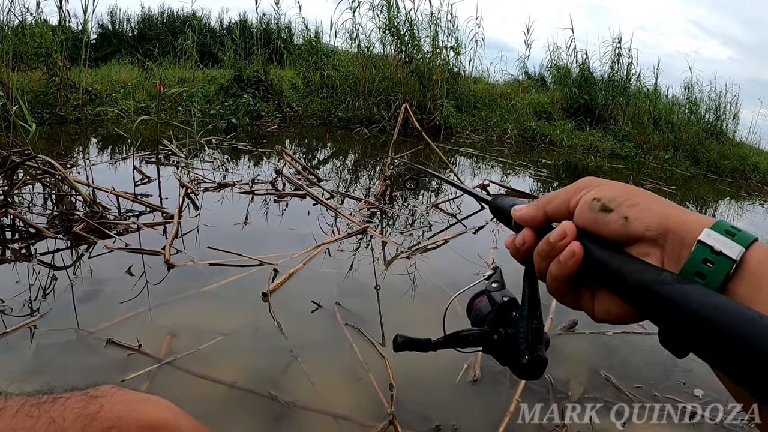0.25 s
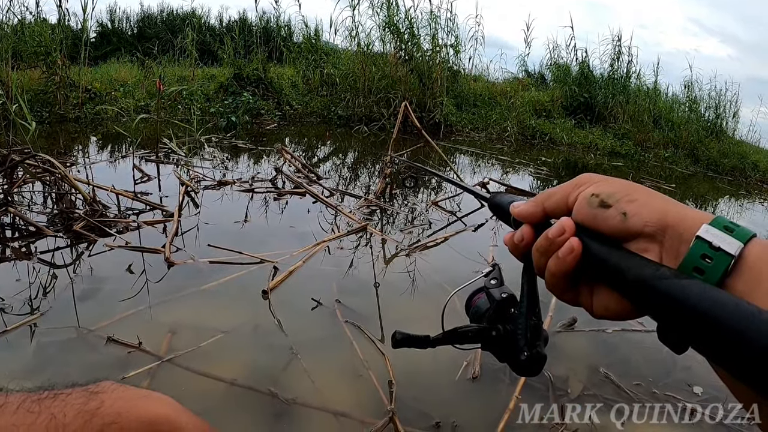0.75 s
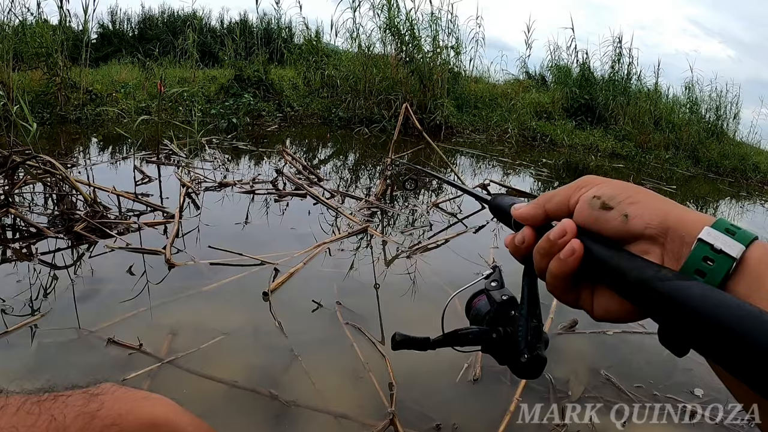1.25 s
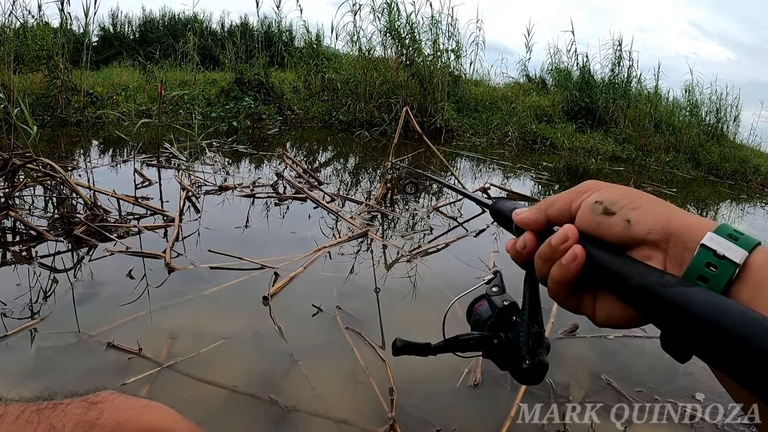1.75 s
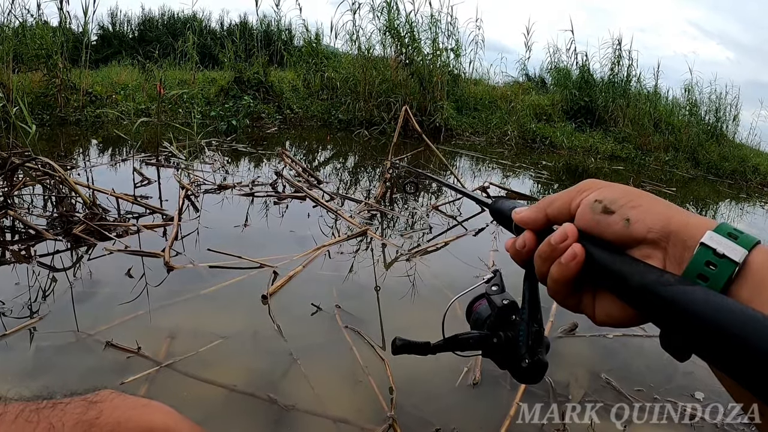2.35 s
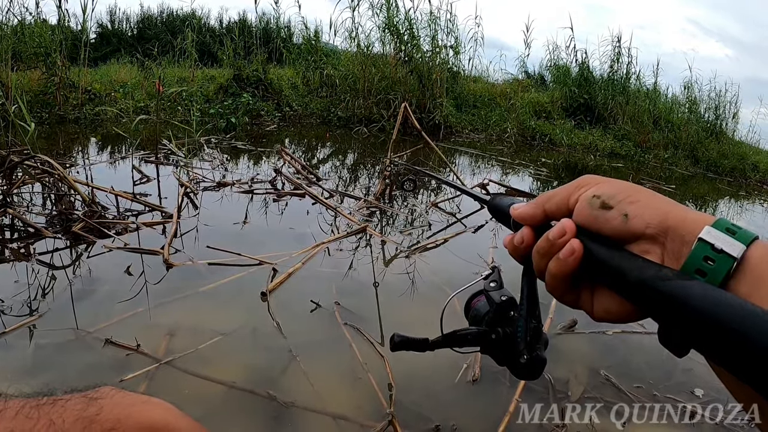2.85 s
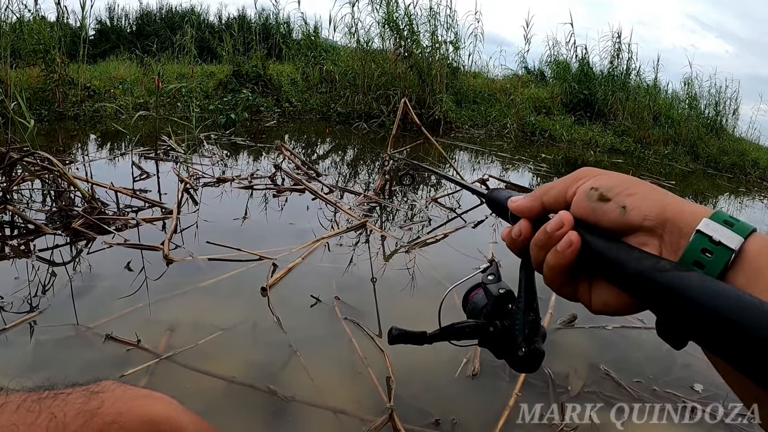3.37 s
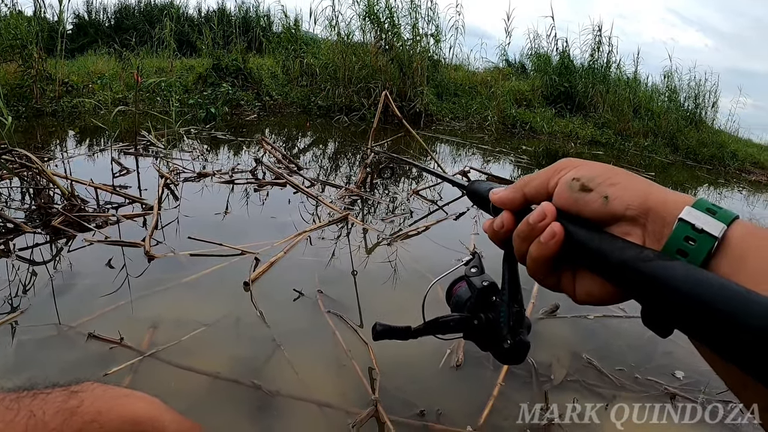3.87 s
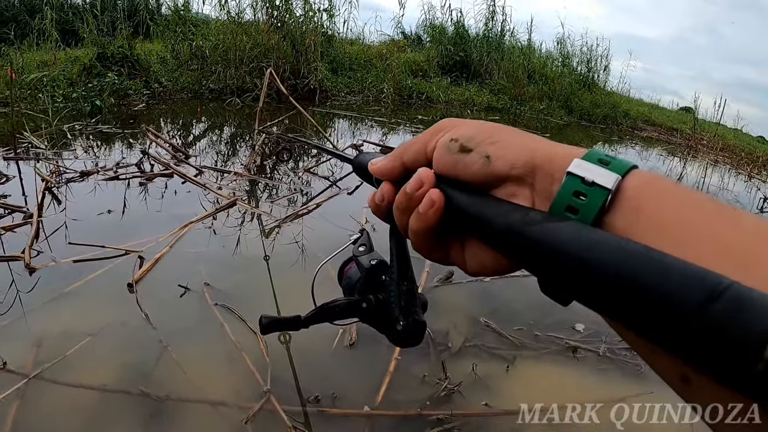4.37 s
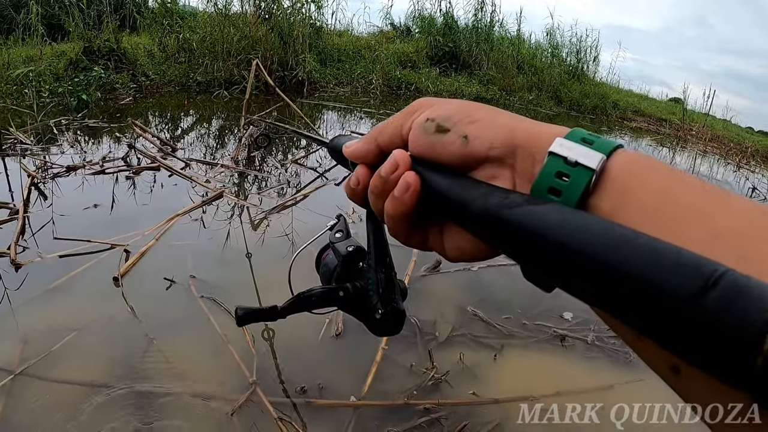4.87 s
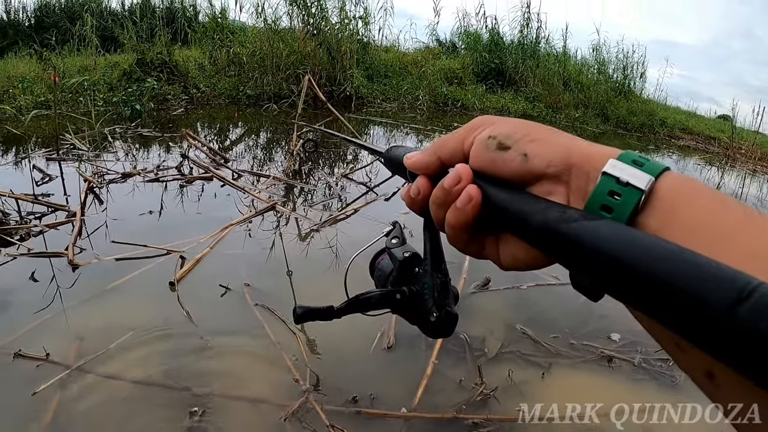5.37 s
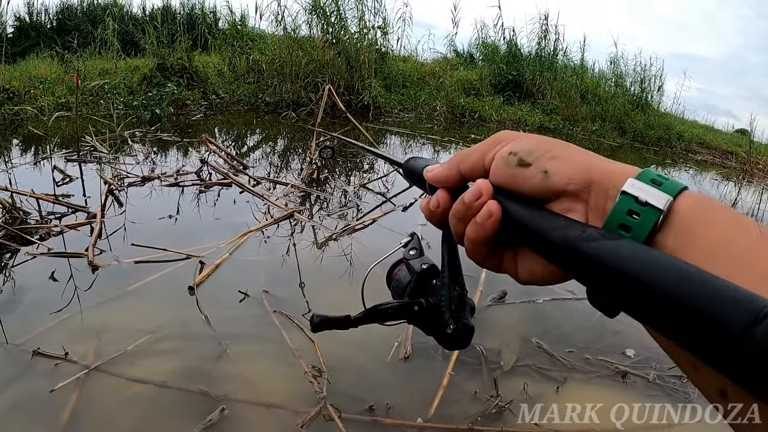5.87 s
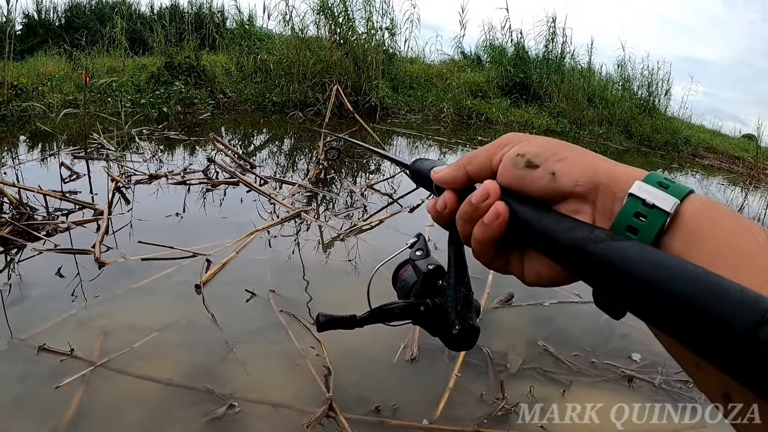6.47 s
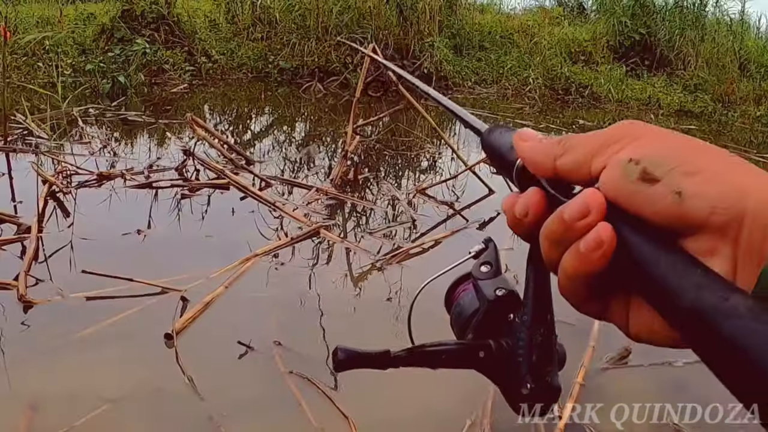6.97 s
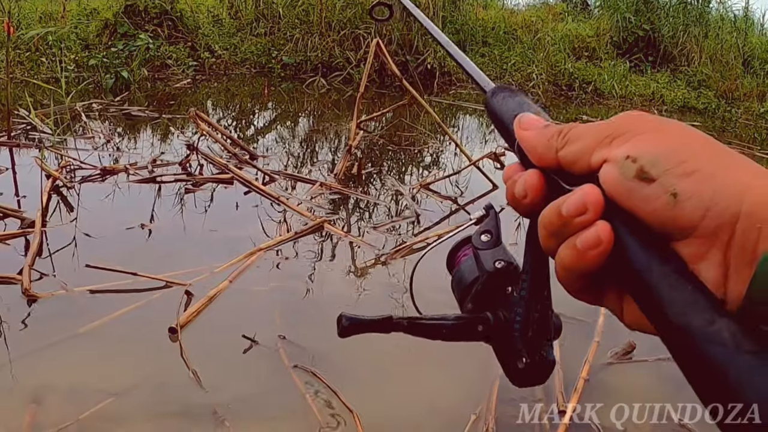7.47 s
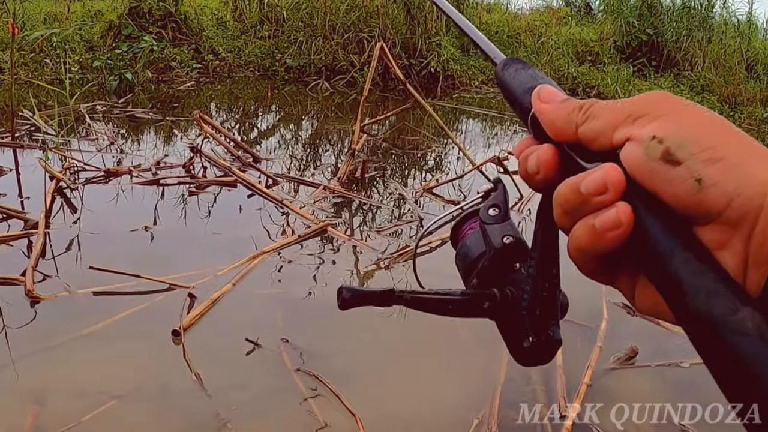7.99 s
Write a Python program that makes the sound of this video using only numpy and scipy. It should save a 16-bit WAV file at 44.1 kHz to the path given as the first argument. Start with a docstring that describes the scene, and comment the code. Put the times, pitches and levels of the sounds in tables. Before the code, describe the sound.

Throughout 0-8 s, a soft, deep rumble of far traffic with a wavering motor hum lies under a steady, shrill bush-cricket whine around 7-8 kHz, finely pulsed. A field cricket adds rapid chirps at 0-0.6, 1.6-3.6, 4.5-7 and at the end. From 0 to 1.8 a near bird, left of centre, sings four short phrases about half a second apart: falling slur, hoarse buzzing trill, wavy warble. Small chips stutter between them. Higher quavering falling whistles come at 1.2, 2.3 and, clearest, 3.3. Thin far whistles sink at 2.7 and 3.6. At 4.0-4.7 cloth swishes close by in two strokes; sharp dry rod and reel ticks cluster at 4.55-4.9, with weaker ones to 5.9. Sparse chips continue; a far fowl calls faintly at 6.2 as an engine swells. Tiny clicks at 7.2. Open air, light echo from reeds and bank.

```python
"""Marshy pond edge, on the microphones of a camera worn by an angler; far traffic rumbles low.
Close in the grass: bush crickets as pulsed bands of noise, a field cricket as chirps of sagging tones.
Birds sing from the reeds on gliding hoarse whistles and a far fowl calls; bank and reeds scatter the songs.
Halfway through the angler turns: cloth swishes as clumpy noise, rod and reel tick as damped rings.
Far engines swell over the background of rumble, thin open air and a wavering motor hum."""
import sys
import numpy as np
from scipy import signal
from scipy.fft import rfft, irfft
from scipy.io import wavfile
from scipy.ndimage import uniform_filter1d

SR = 44100
rng = np.random.default_rng(int(sys.argv[2]) if len(sys.argv) > 2 else 0)


def unload_wav(signal):
    """Save mono or channel-first audio to the path in sys.argv[1] as 16-bit WAV at rate SR, clipped to [-1, 1]."""
    wavfile.write(
        sys.argv[1],
        SR,
        np.round(np.clip(np.atleast_2d(signal).T, -1, 1) * 32767).astype(np.int16),
    )


N = 362943
TIME = np.arange(N) / SR
BIN_HZ = np.fft.rfftfreq(N, 1 / SR)

# In all tables L-R/dB is left minus right. Noise spectra give shape only: the noise is brought to rms 1.
# Near bush crickets: wing strokes/(1/s), level against each other/dB, L-R/dB
SINGERS = [(31.9, -9, 2), (36.7, -8.5, -1), (29.6, -11, 13.5), (65.6, -15, -6.5), (53.2, -13, 10)]
# Ring of their wings: f/Hz, spectral density/dB
WING_SPECTRUM = [(4800, -41), (5600, -34), (6000, -28.5), (6600, -24), (7000, -9), (7350, 1), (7620, 4),
                 (7820, 0.5), (8050, -9), (8350, -19.5), (8800, -22.5), (9400, -29), (10300, -32),
                 (10900, -46), (11300, -66.5)]
# Lean of the chorus across the bank: f/Hz, L-R/dB
WING_SIDES = [(5500, 2), (7000, -2), (7500, -1.5), (8100, -8), (8700, -4.5), (9200, 5.5), (10500, -3.5)]
# Chorus loudness before its trim: t/s, level/dB
CHORUS_LEVEL = [(0.15, -40), (0.24, -39.5), (3.56, -40.5), (4.93, -38.5), (7.86, -38.5), (8.1, -39)]
# Lower-pitched insect beside the chorus: t/s, level/dB
LOW_RASP_LEVEL = [(0, -63), (.7, -67), (1.7, -63), (2.1, -65.5), (4.5, -71), (5, -62), (6, -65), (7.1, -76),
                  (8.2, -78)]
# Ring of its wings: f/Hz, spectral density/dB
LOW_WING_SPECTRUM = [(4500, -49), (5300, -11), (5600, -2.5), (5950, 3), (6200, -12), (7000, -49)]

# Field cricket bouts: first chirp t/s, last chirp t/s, mean starting pitch f/Hz, mean level/dB
BOUTS = [(-.016, 0.593, 6410, -46.5), (1.631, 3.573, 6420, -48), (4.535, 6.984, 6386, -48),
         (7.894, 8.15, 6350, -47.5)]
CLOSURE_S = .013  # one wing closure

# Near bird's phrases: t/s, base level/dB, warble base level/dB, first crest length/s,
# trough/dB, second crest/dB (both against the warble base), L-R/dB
PHRASES = [(0.042, -48.5, -45.5, 0.055, -25, -16.5, 10), (0.533, -48.5, -45, 0.064, -19, -16, 11),
           (0.997, -48, -44.5, 0.071, -20, -4.5, 9.5), (1.464, -48.5, -51, 0.075, -9, -9, 8.5)]
SLUR_S, TRILL_S, WARBLE_S, TRILL_PER_S = .062, .097, .16, 57
# Warble pitch, scooping up, sinking and rising again: t into the warble/s, f/Hz
WARBLE_PITCH = [(0, 2150), (.013, 2600), (.028, 2740), (.052, 2660), (.085, 2260), (.11, 2350),
                (.135, 2500), (.16, 2560)]

# Higher bird: t of the fall/s, fall length/s, top f/Hz, base level/dB, fade over the fall/dB,
# lead-in against the fall/dB, pip ahead of the fall by/s, L-R/dB
QUAVERS = [(1.235, 0.095, 4660, -57, 7, -10, .08, 7), (2.309, 0.133, 4670, -49.5, 14, -15, 0.07, 18),
           (3.278, 0.12, 4670, -41.5, 12, -12, 0.089, 4), (5.692, 0.15, 4620, -60, -1, -2, .075, 4),
           (7.008, 0.128, 4600, -55.5, 1, -7, 0.087, 4.5)]
PIP_S, LEAD_IN_S, QUAVER_PER_S = .033, .02, 31.5

# Syllables of the reed birds, with the near bird's low chips near 2.5 kHz among them: t/s, length/s, pitch
# before the arch f/Hz, glide f/Hz, mean level/dB, L-R/dB
CHIPS = [(0.483, 0.027, 3600, 198, -66, -6), (0.996, 0.024, 2780, 450, -59, 4),
         (1.017, 0.025, 3830, 300, -62, 0), (1.094, 0.03, 3030, 54, -51, 10),
         (0.717, .014, 3500, 300, -57, -6), (0.756, .014, 3440, -200, -51, -6),
         (0.767, .024, 3550, -250, -50.5, -5), (0.787, 0.012, 2600, -700, -58, -1),
         (1.25, 0.022, 2790, 500, -53, 5), (1.3, 0.027, 3840, -1000, -59, -4),
         (1.325, 0.019, 2820, -800, -59, 2), (1.558, 0.014, 3680, 202, -58, -1),
         (1.575, 0.031, 3800, -750, -54.5, -1), (1.668, 0.026, 2740, 398, -47.5, 7),
         (1.776, 0.022, 3600, 307, -61, -1), (1.798, .018, 4050, 249, -63, 1),
         (1.818, 0.023, 3690, -800, -56, -4), (3.163, 0.027, 3530, 350, -61, -4),
         (3.46, 0.02, 3620, 600, -60, -4), (4.715, 0.027, 2860, 200, -52.5, 6),
         (4.748, .016, 3620, -200, -59, 3), (4.945, 0.022, 2900, 450, -61, 4),
         (4.974, 0.014, 3420, 250, -59, 4), (4.999, .028, 3820, 2, -63, 4),
         (5.024, 0.022, 3190, -900, -62.5, 4), (5.273, 0.012, 3280, 300, -57, 2),
         (5.3, 0.016, 3760, 100, -55, 2), (5.314, 0.013, 3080, -900, -57.5, 0),
         (5.521, 0.02, 2560, 100, -63, 8), (5.55, 0.013, 3380, 200, -64.5, 3),
         (5.574, 0.021, 3170, -900, -61, 3), (6.138, 0.043, 2590, 351, -62.5, 16),
         (6.425, 0.008, 2730, -300, -56, 13), (6.439, 0.02, 2450, -200, -55, 18),
         (6.624, 0.027, 3870, 120, -63, 3), (6.643, 0.019, 2430, -50, -53, 15),
         (7.082, 0.024, 1844, -550, -55, 8), (7.153, 0.017, 2050, -150, -61, 9),
         (7.198, .018, 3080, -350, -66, 0), (7.835, 0.028, 3120, -600, -66, 0)]
CHIP_ARCH_HZ = 223

# Far bird's thin whistles: t/s, length/s, mean level/dB, L-R/dB
WHISTLES = [(-.08, 0.13, -58, 5), (2.673, 0.22, -65.5, 11), (3.578, 0.3, -65, 7)]
WHISTLE_HZ, WHISTLE_SAG_HZ_PER_S = 4185, 860

# Faint chips deep in the reeds: rate, mean level, mean pitch, length
FAR_CHIPS_PER_S, FAR_CHIP_DB, FAR_CHIP_HZ, FAR_CHIP_S = 2.4, -72.5, 2790, .04

# Far fowl: one call, level before the throat's gains
FOWL_AT_S, FOWL_S, FOWL_DB = 6.21, .375, -58.5
FOWL_HZ, FOWL_CLIMB_HZ, FOWL_DROP_HZ = 631, 172, 253
# Resonances of its throat: f/Hz, gain/dB
THROAT = [(1150, 2), (1310, 3), (1450, -4), (2000, -37), (2550, -17), (2850, -19), (3150, -26), (3380, -13),
          (3620, -20)]

# Cloth sliding in two strokes as the angler turns: t/s, level/dB
TURN = [(3.9, -72), (4.04, -51), (4.17, -42.5), (4.27, -36.5), (4.36, -38.5), (4.42, -35), (4.47, -39),
        (4.53, -45.5), (4.7, -58)]
# Lighter brushes of the sleeve: middle t/s, half length (to 1/e)/s, peak level/dB
BRUSHES = [(4.771, 0.049, -49), (5.293, 0.066, -56), (5.35, 0.51, -58.5)]
# Sound of the cloth: f/Hz, spectral density/dB
CLOTH_SPECTRUM = [(250, -11), (500, 12), (800, 0), (1300, 4.5), (2000, 1.5), (3200, 1), (4500, -6),
                  (6500, -7), (8500, -21), (10000, -22), (13000, -29), (15000, -42)]
# Treble of the cloth, brightest in the fast slide of the first stroke: t/s, treble gain/dB
SLIDE_TREBLE = [(4.0, 1), (4.27, 2), (4.34, -0.5), (4.45, -1.5), (4.6, 0), (5.0, -2)]
SLIDE_TREBLE_HZ = 2200

# Ticks of rod and reel: t/s, level/dB, ring f/Hz, ring t60/s, rod knock/dB, snap/dB (both against the ring)
TICKS = [(2.786, -51, 2500, .02, -14, -12), (3.504, -50, 4400, .012, -25, -1),
         (4.554, -32, 3700, 0.008, -5, -10), (4.5555, -31, 2470, 0.011, -7, -13),
         (4.6355, -27, 4550, 0.011, 0, 1.5), (4.652, -37, 1400, 0.015, -2, -5),
         (4.7133, -34, 6050, .009, -16, -5), (4.773, -44, 1510, 0.022, -4, -14),
         (4.78, -37, 1150, .02, -8, -14), (4.8355, -23.5, 5600, 0.011, -35, -32),
         (4.881, -42, 3400, 0.0084, -8, -6), (4.8842, -32, 1940, 0.01, -7, -6),
         (5.1455, -48, 2450, .02, -5, -12), (5.298, -39, 1950, .015, 1, -8),
         (5.3835, -44, 1620, 0.027, -18, -20), (5.429, -42.5, 1600, 0.032, -18, -20),
         (5.876, -49, 1600, 0.021, 1, -14), (7.2295, -46.5, 4950, 0.013, -3, 4),
         (7.231, -48, 3650, 0.016, -16, -1), (7.239, -49, 4500, .015, -16, -3)]
# Rod's answer to every tick: f/Hz, level/dB, t60/s
ROD_RINGS = [(1100, -14, 0.016), (1410, -5.5, 0.017), (1700, -5, .012), (2350, -9, 0.016),
             (1550, -16, 0.073)]
# Snap of hard parts meeting: f/Hz, spectral density/dB
SNAP_SPECTRUM = [(1500, -4), (3500, 0), (6000, 3), (9000, -7), (12300, -19), (14000, -27)]

# Scatter from the reeds and the far bank: f/Hz, t60/s
BANK_DECAY = [(500, 0.15), (3000, 0.29), (8000, 0.022)]

# Far road engines: t/s, length/s, mid firing rate f/Hz, change f/Hz, level before overtone gains/dB
ENGINES = [(0.399, 0.99, 90.5, 4.5, -55), (1.254, 0.83, 96.6, 2, -50), (3.147, .9, 94.6, -9.5, -53),
           (6.152, 0.82, 75.96, 0, -46)]
# Distant rumble: f/Hz, spectral density/dB
RUMBLE_SPECTRUM = [(11, -33), (22, -9.5), (36, -7), (54, 0.5), (100, 0), (130, -.5), (165, -3.5), (226, -9),
                   (339, -21), (483, -30), (700, -40), (850, -52.5), (1100, -78), (1870, -120)]
# Open air: f/Hz, spectral density/dB
AIR_SPECTRUM = [(500, -1), (820, -3.5), (1000, 4), (1350, -1.5), (1800, -6.5), (2600, -11), (4000, -13.5),
                (5000, -15), (9000, -16), (11000, -38.5), (15000, -55)]
RUMBLE_DB, AIR_DB = -21.5, -58.5
# Far motor's hum inside the rumble: mean f/Hz, mean level/dB
HUM = [(121.7, -35), (61.2, -46.5), (229.3, -47.5)]
# Left-right likeness of sound from all around: f/Hz, coherence/1
COHERENCE = [(30, 0.985), (100, .997), (180, 0.992), (280, .97), (420, .93), (700, 0.82), (1400, 0.66),
             (3000, 0.2), (8000, 0.062)]
EDGE_HZ = 15150  # upper band limit of the camera


def chorus(crowd_db=-0.5, trim_db=3.5, stroke_sharpness=1.5, unsteady=0.01):
    """Each wing stroke is a short rasp; a few near singers throb over the blur of many far ones."""
    rasp = gain_of(crowd_db) * rng.standard_normal((2, N))
    for per_s, db, side_db in SINGERS:
        turns = np.cumsum(per_s * (1 + unsteady * drift(4.12))) / SR + rng.random()
        stroke = evened(abs(np.sin(np.pi * turns)) ** stroke_sharpness)
        rasp += gain_of(db) * sides(side_db) * stroke * rng.standard_normal((2, N))
    rasp = irfft(rfft(rasp) * sides(read(WING_SIDES, BIN_HZ)), N)
    return gain_of(along(CHORUS_LEVEL) + trim_db) * colour(rasp, WING_SPECTRUM)


def low_insect():
    """A narrow rasp just under the chorus in pitch swells and fades."""
    return gain_of(along(LOW_RASP_LEVEL)) * colour(diffuse(), LOW_WING_SPECTRUM)


def cricket(chirp_s=.1218, stroke_s=.0152, sag_hz=350, scrape_hz=5600, scrape_db=-15, side_db=7):
    """Four wing closures make a chirp; each sags in pitch as it slows, over a faint lower scrape."""
    out, u = np.zeros((2, N)), progress(CLOSURE_S)
    for first, last, top_hz, db in BOUTS:
        for s in np.linspace(first, last, round((last - first) / chirp_s) + 1):
            for closure in range(4):
                hz = top_hz + 42 * rng.standard_normal() - sag_hz * u ** 5
                turns = np.cumsum(hz) / SR + rng.random()
                pulse = np.sin(np.pi * u) * np.sin(2 * np.pi * turns)
                scrape = syrinx(np.full(len(u), scrape_hz), overtone_db=-60, rough=.06)
                pulse += gain_of(scrape_db) * np.sin(np.pi * u) ** 4 * scrape
                level_db = db + rng.standard_normal()
                add(out, s + closure * stroke_s, gain_of(level_db) * place(pulse, side_db))
    return out


def near_bird():
    """Slur, trill and warble follow each other without a break."""
    out = np.zeros((2, N))
    for s, db, warble_db, crest_s, trough_db, end_db, side_db in PHRASES:
        add(out, s, slur(db, side_db))
        add(out, s + SLUR_S, trill(db, side_db))
        add(out, s + SLUR_S + TRILL_S, warble(warble_db, side_db, crest_s, trough_db, end_db))
    return out


def slur(db, side_db, from_hz=3480, to_hz=2800, swell_db=7, flutter_db=-4.5):
    """A whistle slides steadily down in pitch while it swells and flutters."""
    u = progress(SLUR_S)
    hz = from_hz + (to_hz - from_hz) * u
    level_db = db + swell_db * (u - .5) + flutter_db * drift(140)[:len(u)]
    return note(hz, level_db, side_db, rough=0.017, edge=0.081, overtone_db=-12.5)


def trill(db, side_db, top_hz=2560, swing_hz=500, sag_hz=190, purr_db=-16, fade_db=10, flare_db=7.5,
          flare_s=0.0027, flare_share=0.15, uneven=0.027, haze_hz=4150, haze_db=-17,
          rasp_db=-14, croak_hz=2050, croak_db=-14):
    """Uneven beats, each a sharp flare sweeping down into a low purr, sit in a hoarse haze and croak."""
    u = progress(TRILL_S)
    turns = TRILL_PER_S * (u * TRILL_S - flare_s) + uneven * drift(72)[:len(u)]
    beat = (turns + .5) % 1 - .5  # 0 at the flare
    flare = np.exp(-(beat / flare_share) ** 2)
    sag = sag_hz * u
    hz = top_hz - sag - swing_hz * (np.sin(np.pi * beat) ** 2 + 2 * beat * flare)
    effort_db = db - fade_db * (1.35 * u - .4) ** 2  # strongest at three tenths, then weakening
    tone_db = flare * (effort_db + flare_db) + (1 - flare) * (db + purr_db)
    tone = note(hz, tone_db, side_db, rough=.04, edge=.03)

    def hoarse(pitch_hz, level_db, rough, edge=.083):
        """A very rough note flutters quickly in level."""
        return note(pitch_hz, level_db + 4 * drift(400)[:len(u)], side_db, rough, edge)

    rasp = hoarse(hz + swing_hz, effort_db + rasp_db, .16)
    haze = hoarse(haze_hz - sag, effort_db + haze_db, .08, edge=.3)
    croak = hoarse(croak_hz - sag, db + croak_db, .1, edge=.3)
    return tone + rasp + haze + croak


def warble(db, side_db, crest_s, trough_db, end_db, rise_s=.011, rise_db=18, sag_db_per_s=110,
           top_db=3.0, return_s=0.12, switch_s=.004):
    """A slow wave in pitch: loud on its first crest, it drops to a thin thread, then returns."""
    t = progress(WARBLE_S) * WARBLE_S
    first = .5 - .5 * np.tanh((t - crest_s) / switch_s)
    second = .5 + .5 * np.tanh((t - return_s) / switch_s)
    crest_db = top_db - sag_db_per_s * t - rise_db * np.maximum(1 - t / rise_s, 0)
    level = first * gain_of(crest_db) + gain_of(trough_db) + second * gain_of(end_db)
    hz = np.interp(t, *np.transpose(WARBLE_PITCH))
    return level * note(hz, db, side_db, edge=0.091)


def high_bird(pip_below_hz=350, pip_arch_hz=750, pip_db=-10, lead_in_below_hz=420, scoop_hz_per_s=22000,
              jump_s=.002, fall_hz=720, quaver_hz=135, dip_db=1.0, crest_db=1, flutter_db=2):
    """An arched pip; then a rising lead-in jumps to the top pitch and quavers down."""
    out, arch = np.zeros((2, N)), (2 * progress(PIP_S) - 1) ** 2
    for s, length, top_hz, db, fade_db, lead_in_db, pip_lead_s, side_db in QUAVERS:
        pip_hz = top_hz - pip_below_hz - pip_arch_hz * arch
        add(out, s - pip_lead_s, note(pip_hz, db + pip_db, side_db, edge=0.59))
        t = progress(length + LEAD_IN_S) * (length + LEAD_IN_S) - LEAD_IN_S
        fall_s = np.maximum(t, 0)
        u = fall_s / length
        lead_in = .5 - .5 * np.tanh(t / jump_s)
        quaver = 2 * np.sin(np.pi * (QUAVER_PER_S * fall_s % 1) ** .7) - 1  # quick rise, slower sink
        hz = top_hz - (lead_in_below_hz - scoop_hz_per_s * t) * lead_in
        hz += quaver_hz * np.sqrt(2 * u) * quaver - fall_hz * u ** 2.5
        level_db = db + crest_db + lead_in_db * lead_in - fade_db * u
        level_db += dip_db * (quaver - 1) + flutter_db * drift(110)[:len(t)]
        add(out, s - LEAD_IN_S, note(hz, level_db, side_db, rough=.011, edge=.16))
    return out


def reed_birds():
    """Short hoarse syllables of the reed birds, and the near bird's low chips, come single or in stuttering
    runs."""
    out = np.zeros((2, N))
    for s, length, hz, glide_hz, db, side_db in CHIPS:
        add(out, s, chip(length, hz, glide_hz, db, side_db))
    return out


def chip(length, hz, glide_hz, db, side_db, flutter_db=3):
    """A short hoarse note bends over as it glides."""
    u = progress(length)
    contour = hz + glide_hz * (u - .5) - CHIP_ARCH_HZ * (2 * u - 1) ** 2
    return note(contour, db + flutter_db * drift(170)[:len(u)], side_db, rough=0.033, edge=0.29)


def clothing(clump_db=1.0, snags_per_s=900, snag_db=-6, side_db=3.5, direct_db=-2):
    """Fibres slip in small clumps under the turning arm, close to both microphones, and threads snag."""
    snags = (rng.random(N) < snags_per_s / SR) * diffuse()
    rub = evened(diffuse()) + gain_of(direct_db) * rng.standard_normal(N)  # second part alike on both sides
    fibres = evened(rub) + gain_of(snag_db) * evened(snags)
    slips = colour(fibres * gain_of(clump_db * drift(220)), CLOTH_SPECTRUM)
    body = signal.sosfiltfilt(signal.butter(2, SLIDE_TREBLE_HZ, fs=SR, output="sos"), slips)
    treble = slips - body
    turn = gain_of(along(TURN)) * (TIME > TURN[0][0]) * (TIME < TURN[-1][0])
    brushes = sum(gain_of(db) * np.exp(-((TIME - s) / half_s) ** 2) for s, half_s, db in BRUSHES)
    return (turn + brushes) * sides(side_db) * (body + gain_of(along(SLIDE_TREBLE)) * treble)


def tackle(snap_t60=0.0059, side_db=1, rise_s=0.00064):
    """Each tick is a bright snap, a knock through the rod and one damped ring."""
    out, t = np.zeros((2, N)), np.arange(3000) / SR
    grit = colour(diffuse(), SNAP_SPECTRUM)
    rod = sum(gain_of(db - 60 * t / t60) * np.sin(2 * np.pi * hz * t) for hz, db, t60 in ROD_RINGS)
    for s, db, hz, t60, rod_db, bright_db in TICKS:
        start = round(s * SR)
        snap = gain_of(bright_db - 60 * t / snap_t60) * grit[:, start:start + len(t)]
        rise = 1 - np.exp(-(t / rise_s) ** 2)
        ring = rise * gain_of(-60 * t / t60) * np.sin(2 * np.pi * hz * t)
        add(out, s, gain_of(db) * sides(side_db) * (snap + gain_of(rod_db) * rod + ring))
    return out


def whistler(flutter_db=2, fade_db=7):
    """A far bird's thin whistles sink at a steady rate and fade."""
    out = np.zeros((2, N))
    for s, length, db, side_db in WHISTLES:
        u = progress(length)
        hz = WHISTLE_HZ - WHISTLE_SAG_HZ_PER_S * u * length
        level_db = db - fade_db * (u - .5) + flutter_db * drift(80)[:len(u)]
        add(out, s, note(hz, level_db, side_db, rough=0.018, edge=0.34))
    return out


def fowl():
    """A far call climbs, then drops; overtones swell and thin as they pass the throat's resonances."""
    out, u = np.zeros((2, N)), progress(FOWL_S)
    hz = FOWL_HZ + FOWL_CLIMB_HZ * u - FOWL_DROP_HZ * u ** 6
    overtones = [(k, read(THROAT, k * hz)) for k in range(2, 6)]
    add(out, FOWL_AT_S, far_tone(hz, FOWL_DB, overtones, waver=0.004, edge=0.1))
    return out


def far_chips(spread_hz=700, glide_hz=600, spread_db=3, side_db=7):
    """Birds deep in the reeds chip at random moments."""
    out = np.zeros((2, N))
    draws = rng.uniform(-1, 1, (round(FAR_CHIPS_PER_S * N / SR), 5))
    for when, pitch, glide, level, side in draws:
        hz, db = FAR_CHIP_HZ + spread_hz * pitch, FAR_CHIP_DB + spread_db * level
        sound = chip(FAR_CHIP_S, hz, glide_hz * glide, db, side_db * side)
        add(out, (when + 1) / 2 * N / SR, sound)
    return out


def bank(x):
    """Sparse echoes from reeds and bank, different on each side, die away band by band."""
    taps = rng.standard_normal((2, SR)) * (rng.random((2, SR)) < .05)
    hz, t, bands = signal.stft(taps, SR, nperseg=256)
    decay = gain_of(-60 * t / read(BANK_DECAY, hz)[:, None])
    tail = signal.istft(bands * decay, SR, nperseg=256)[1]
    tail /= np.linalg.norm(tail, axis=1, keepdims=True)
    return signal.fftconvolve(x.mean(0)[None], tail, axes=1)[:, :N]


def far_shore(x, delay_s=0.065):
    """The opposite shore throws a song back, late and smeared."""
    late = np.pad(x, ((0, 0), (round(delay_s * SR), 0)))[:, :N]
    return bank(late)


def engines():
    """Engines on a far road swell and fade while their speed holds or changes steadily."""
    out = np.zeros((2, N))
    for s, length, hz, change_hz, db in ENGINES:
        firing_hz = hz + change_hz * (progress(length) - .5)
        add(out, s, far_tone(firing_hz, db, [(4, 0.9), (5, 0.5)], waver=0.007, edge=0.52))
    return out


def background(swell_db=1.07, hum_swell_db=3.5, waver_hz=1.736):
    """Swelling rumble and steady faint air are shaped noise; a far motor's hum is wavering tones."""
    rumble = gain_of(RUMBLE_DB + swell_db * drift(3.89)) * colour(diffuse(), RUMBLE_SPECTRUM)
    air = gain_of(AIR_DB) * colour(diffuse(), AIR_SPECTRUM)
    hum = np.zeros(N)
    for hz, db in HUM:
        turns = np.cumsum(hz + waver_hz * drift(9)) / SR
        hum += gain_of(db + hum_swell_db * drift(14)) * np.sin(2 * np.pi * turns)
    return rumble + air + hum


def syrinx(hz, overtone_db, rough):
    """A bird's whistle near rms 1 with a weak octave; pitch jitter makes it hoarse."""
    jitter = evened(uniform_filter1d(rng.standard_normal(len(hz)), 60))
    phase = 2 * np.pi * np.cumsum(hz * (1 + rough * jitter)) / SR
    return np.sqrt(2) * (np.sin(phase) + gain_of(overtone_db) * np.sin(2 * phase))


def note(hz, db, side_db, rough=0.0081, edge=0.083, overtone_db=-28):
    """One bird note on a pitch and level contour; its soft edges take a share of its length."""
    envelope = gain_of(db) * signal.windows.tukey(len(hz), edge)
    return place(envelope * syrinx(hz, overtone_db, rough), side_db)


def far_tone(hz, db, overtones, waver, edge):
    """A distant pitched source, of which only a few overtones (multiple, level/dB) carry."""
    phase = 2 * np.pi * np.cumsum(hz * (1 + waver * drift(60)[:len(hz)])) / SR
    tone = sum(gain_of(tone_db) * np.sin(k * phase) for k, tone_db in overtones)
    return place(np.sqrt(2) * gain_of(db) * signal.windows.tukey(len(hz), edge) * tone, 0)


def diffuse(lag_s=.00009):
    """White noise from all around: alike on both sides in the bass, nearly unrelated in the treble."""
    a, b = rfft(rng.standard_normal((2, N)))
    same = read(COHERENCE, BIN_HZ)
    mid, side = np.sqrt(1 + same) * a, np.sqrt(1 - same) * b
    late = np.exp(-2j * np.pi * BIN_HZ * lag_s)  # the right side hears it first
    return irfft(np.array([(mid + side) * late, mid - side]), N)


def place(x, side_db):
    """The farther microphone hears a source weaker and a few samples later."""
    return sides(side_db) * np.array([x, np.roll(x, round(side_db / 3))])


def sides(db):
    """Left and right gains for a level difference."""
    return gain_of(np.array([[.5], [-.5]]) * db)


def colour(x, points):
    """Gives x a spectrum, at rms 1."""
    return evened(irfft(rfft(x) * gain_of(read(points, BIN_HZ)), N))


def drift(per_s):
    """Random wandering through per_s knots a second, near rms 1."""
    knots = evened(uniform_filter1d(rng.standard_normal(4096), 2, mode="wrap"))
    return np.interp(TIME * per_s, np.arange(len(knots)), knots)


def gain_of(db):
    """Decibels to amplitude."""
    return 10 ** (np.asarray(db) / 20)


def evened(x):
    """Scales to rms 1."""
    return x / np.sqrt(np.mean(x ** 2) + 1e-20)


def read(points, hz):
    """Reads a table on a log-frequency axis."""
    f, value = np.transpose(points)
    return np.interp(np.log(hz + 1), np.log(f + 1), value)


def along(rows):
    """Reads a (t/s, value) curve at every sample."""
    return np.interp(TIME, *np.transpose(rows))


def progress(length_s):
    """Runs from 0 to 1 over a sound of this length."""
    return np.linspace(0, 1, round(length_s * SR))


def add(mix, s, sound):
    """Mixes a stereo sound in at time s, cut where it passes either end."""
    start = round(s * SR)
    sound = sound[:, max(-start, 0):]
    part = mix[:, max(start, 0):][:, :sound.shape[1]]
    part += sound[:, :part.shape[1]]


def scene(near_echo_db=-14, high_echo_db=-12, far_echo_db=-4, reed_echo_db=-11, cricket_echo_db=-3,
          near_shore_db=-22, high_shore_db=-15):
    """Near and reed birds are fairly dry; far birds and the field cricket come with more scatter."""
    near, high, reeds, chirps = near_bird(), high_bird(), reed_birds(), cricket()
    far = whistler() + far_chips() + fowl()
    to_bank = gain_of(near_echo_db) * near + gain_of(high_echo_db) * high + gain_of(reed_echo_db) * reeds
    to_bank += gain_of(far_echo_db) * far + gain_of(cricket_echo_db) * chirps
    to_shore = gain_of(near_shore_db) * near + gain_of(high_shore_db) * high
    echoes = bank(to_bank) + far_shore(to_shore)
    singers = chorus() + low_insect() + chirps + near + high + reeds + far
    return singers + echoes + clothing() + tackle() + engines() + background()


def record(dry):
    """The camera's band limit cuts the top treble; the two ends fade over a few milliseconds."""
    low_pass = signal.firwin(511, EDGE_HZ, window=("kaiser", 9), fs=SR)
    return signal.oaconvolve(dry, low_pass[None], "same") * signal.windows.tukey(N, .001)


dry = scene()
out = record(dry)
unload_wav(out)
```